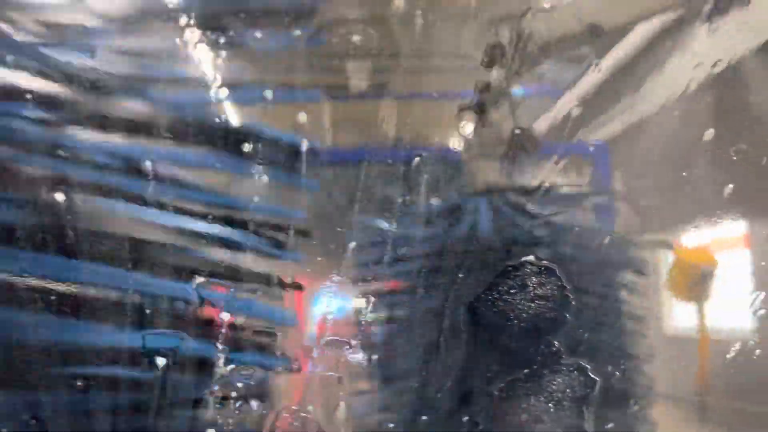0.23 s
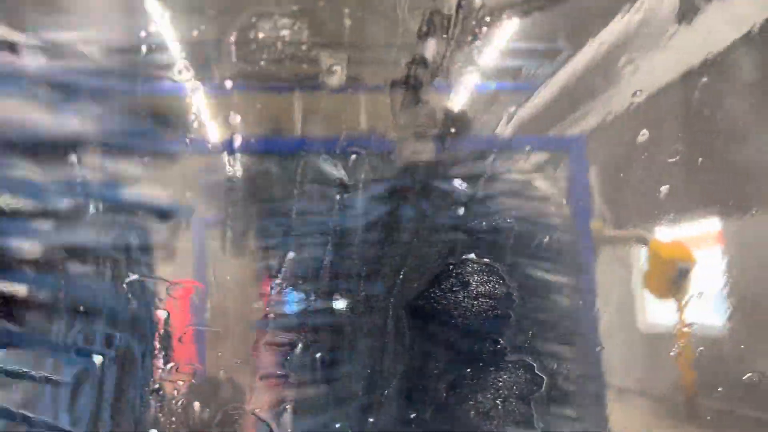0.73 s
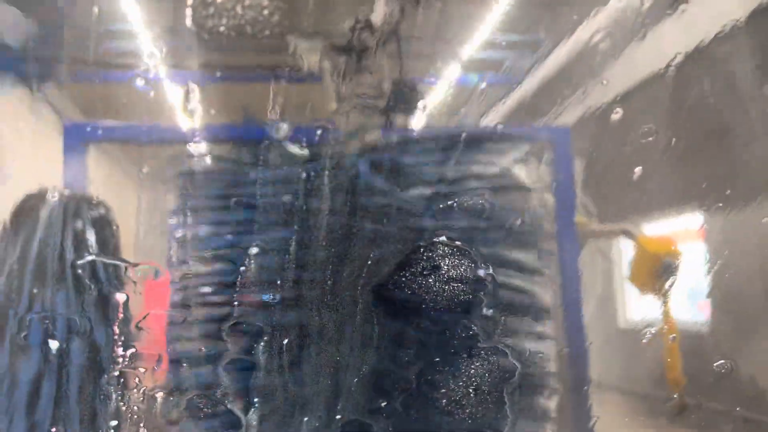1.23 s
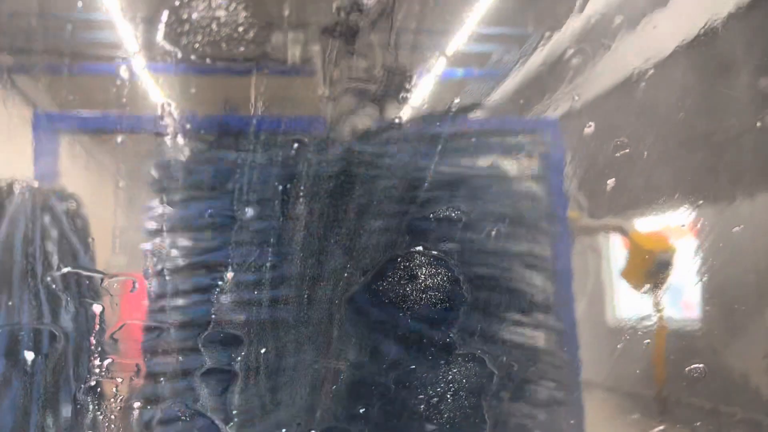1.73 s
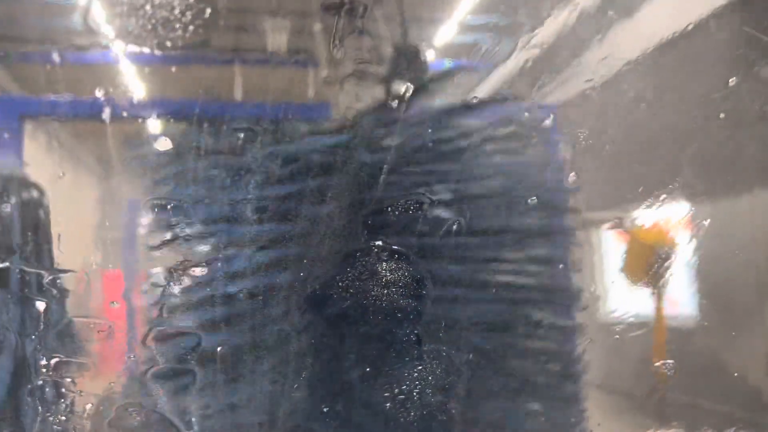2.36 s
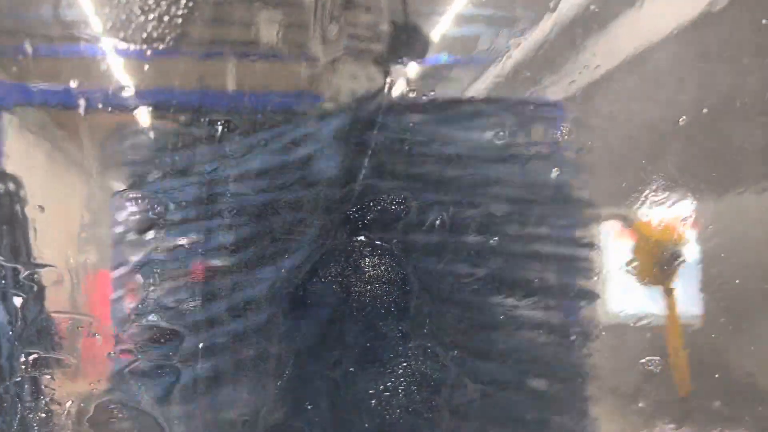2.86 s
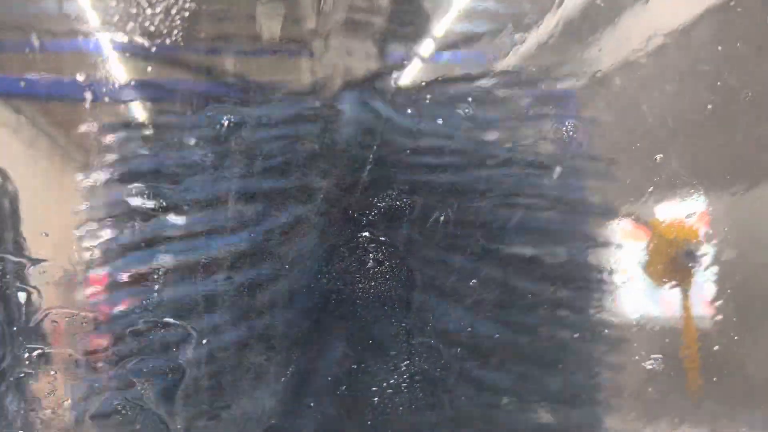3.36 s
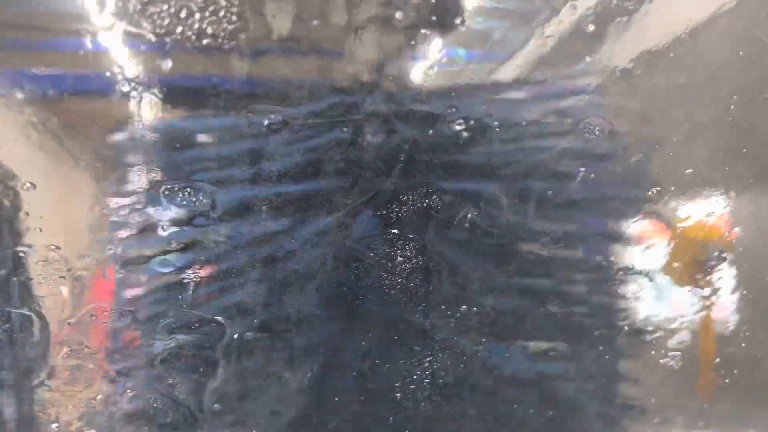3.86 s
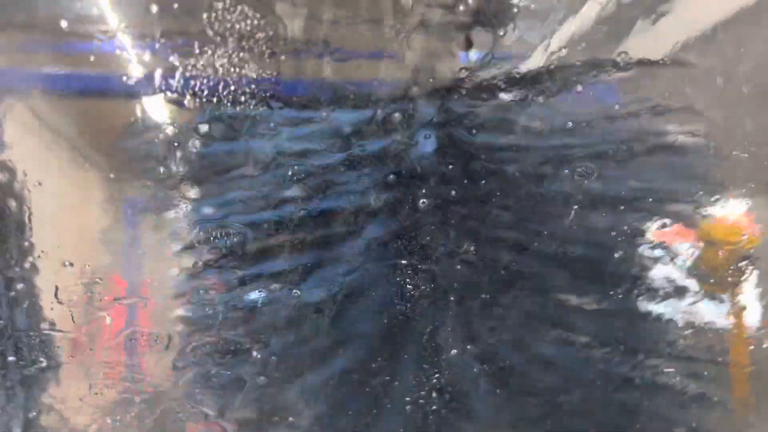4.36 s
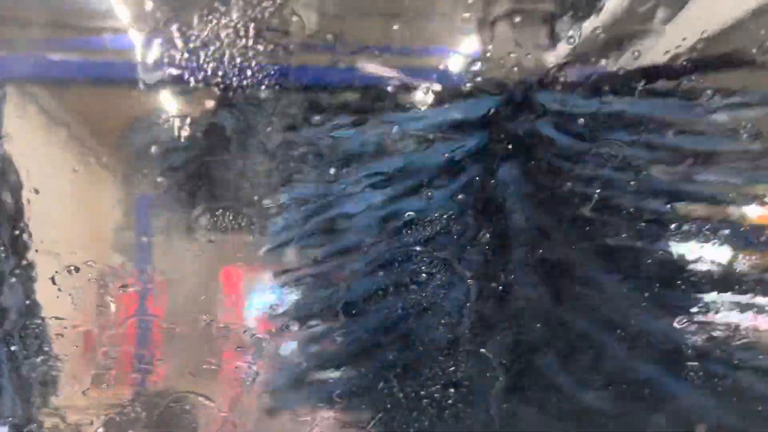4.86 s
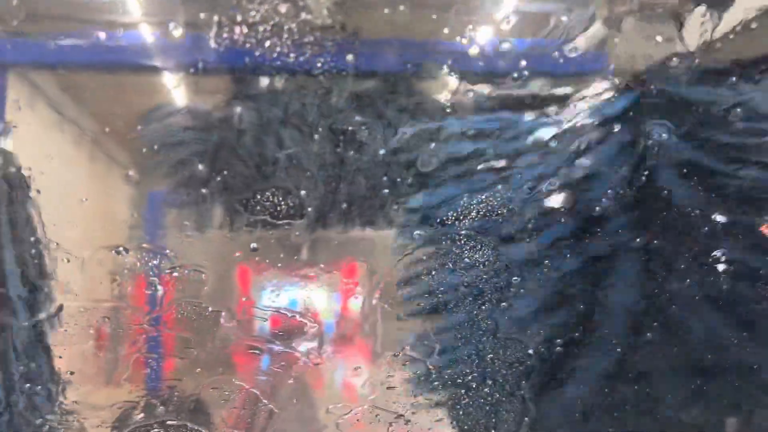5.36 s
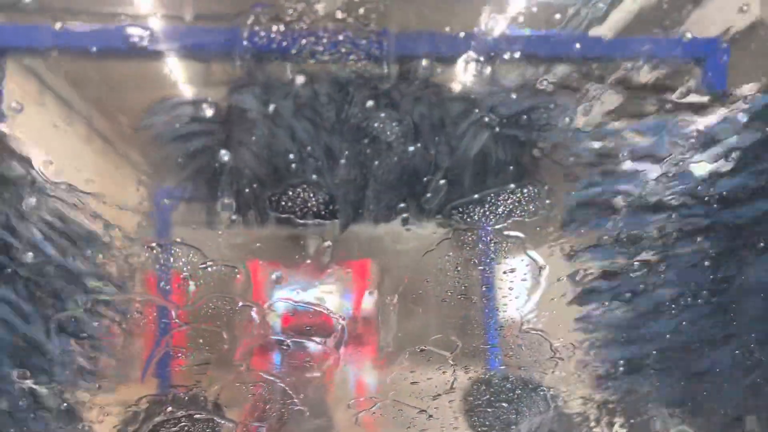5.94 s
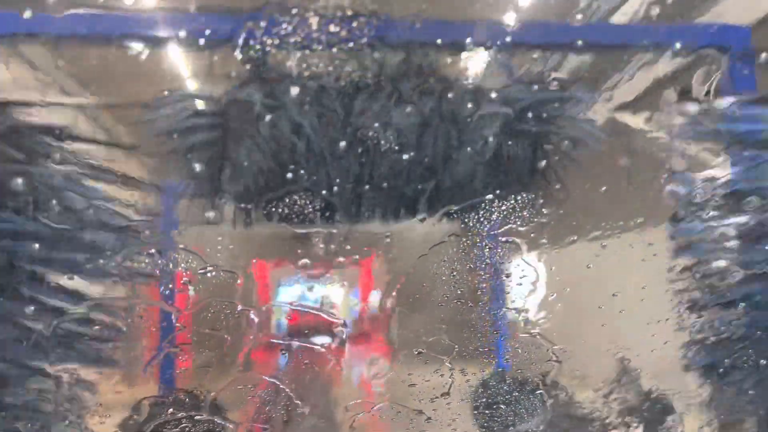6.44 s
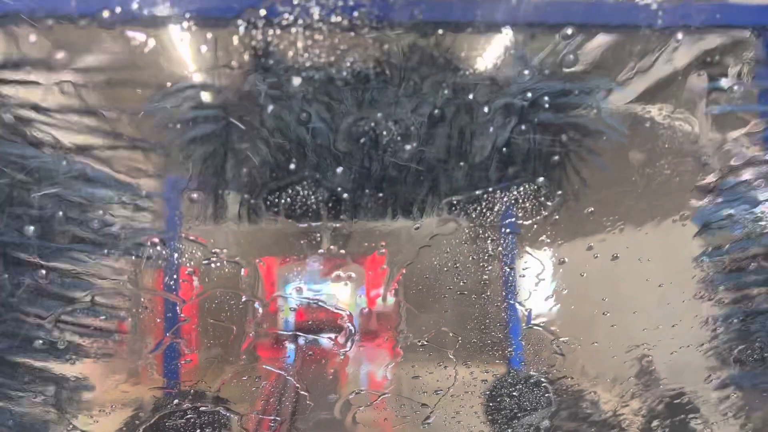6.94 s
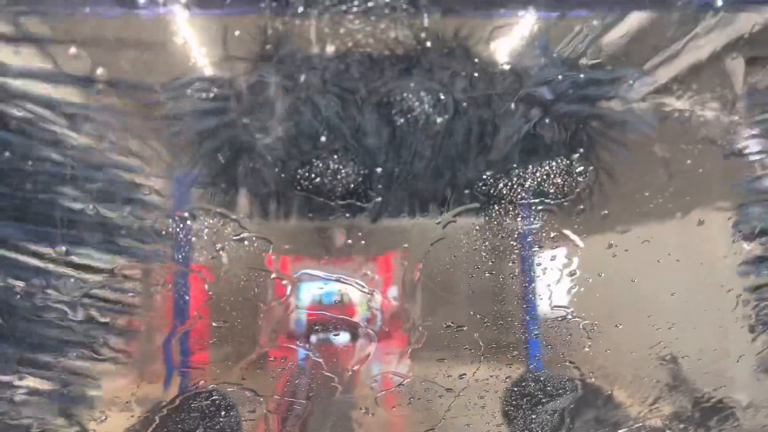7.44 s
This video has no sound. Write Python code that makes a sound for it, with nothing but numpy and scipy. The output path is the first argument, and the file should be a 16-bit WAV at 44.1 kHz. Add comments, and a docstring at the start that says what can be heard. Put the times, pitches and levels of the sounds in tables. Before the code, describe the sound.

Inside a closed car in an automatic wash, big cloth brushes drum and rumble on the body while water spray rushes and spatters over the glass.

```python
"""Front seats of a car in an automatic car wash, windows closed, a pair of microphone ports in the cabin.
From the start cloth brushes boom and drum on the body, spray rushes over the glass and machinery hums and whines.
Splats and hard drops hit the windscreen at once; soon a panel groans and knotted strip ends thump the door.
The roof boom and the spray ebb by the middle; just after 5 s the spray rushes up again, then thins out.
Blows and drops are shaped noise and short rings, panels are resonances, and the machines are wavering sines."""
import sys
import numpy as np
from scipy import signal
from scipy.fft import rfft, irfft
from scipy.io import wavfile
from scipy.ndimage import uniform_filter1d

SR = 44100
rng = np.random.default_rng(int(sys.argv[2]) if len(sys.argv) > 2 else 0)


def output_pcm(signal):
    """Save a mono or channel-first signal as 16-bit PCM at the path in sys.argv[1].

    Samples are clipped to [-1, 1] before scaling.
    """
    pcm = np.clip(np.atleast_2d(signal).T, -1, 1) * 32767
    wavfile.write(sys.argv[1], SR, np.round(pcm).astype(np.int16))


N = 339570

# Resonances of the roof with the cabin air. Each row: centre in Hz, width in Hz, relative level in dB.
ROOF_MODES = [(47, 14, 0), (66, 18, 1)]
# Resonances of the doors. Each row: centre in Hz, width in Hz, relative level in dB.
DOOR_PANEL_MODES = [(109, 43, 1.5), (149, 61, 2.5), (183, 69, -3.5)]
# Resonances of bonnet and windows. Each row: centre in Hz, width in Hz, relative level in dB.
BONNET_WINDOW_MODES = [(243, 94, -2.5), (306.5, 85, 0), (360, 42, -5.5), (448.5, 149, -9), (521, 90, -12),
                       (680, 142, -17)]
# Colour of fine spray behind the glass. Each row: frequency in Hz, relative level in dB per Hz.
SPRAY_COLOUR = [(600, 2.5), (1200, -2.5), (1900, 1.5), (2600, -.5), (3300, -2.5), (4200, -9.5),
                (5200, -19.5), (6300, -20), (8500, -28.5), (14000, -41)]
# Colour of drops behind the glass. Each row: frequency in Hz, relative level in dB per Hz.
DROP_COLOUR = [(1200, -28), (2600, 3.5), (3800, 3), (4800, 0.5), (6200, -11), (8300, -21.5), (11000, -39.5),
               (14500, -38.5)]
# How hard the brushes press on the car. Each row: time in seconds, pressure in dB above the usual.
BRUSH_PRESSURE = [(0, 1.5), (.47, 3.5), (1.0, 1), (2.1, 0.95), (3.3, -0.2), (4.0, 0), (5.05, 0.5),
                  (5.15, 0.3), (5.7, 0), (6.7, -0.3), (7.7, -0.5)]
# Roof boom, ebbing as the car rolls on; the pump hum follows. Each row: time in seconds, level in dB before trim.
ROOF_BOOM = [(0, -21.5), (.6, -21), (1.2, -22.5), (2.2, -24), (2.9, -22.5), (3.5, -26.5), (4.1, -26.5),
             (4.6, -27.5), (5.4, -28.5), (7.7, -27.5)]
# Water thrown at the glass, with a sudden rush as the brush swings aside.
# Each row: time in seconds, fine spray level in dB before trim.
WATER_FLOW = [(0, -36), (.55, -36.5), (.75, -38.5), (1.55, -37.5), (2.2, -39.5), (2.9, -41), (3.6, -42.5),
              (5.08, -42.5), (5.13, -37.5), (5.4, -38.5), (5.7, -38.5), (6.4, -39.5), (7.7, -42.5)]


def undb(db):
    """Decibels to gain."""
    return 10 ** (np.asarray(db) / 20)


def unit(x):
    """Scale to rms 1."""
    return x / np.sqrt(np.mean(x ** 2))


def curves(table):
    """The columns of a timed table, one value a sample."""
    s, *columns = np.transpose(table)
    return [np.interp(np.arange(N) / SR, s, c) for c in columns]


def over_hz(table):
    """The columns of a frequency table, one value a spectral bin, read along a log-frequency axis."""
    hz, *columns = np.transpose(table)
    log_bins = np.log(np.fft.rfftfreq(N, 1 / SR) + 1)
    return [np.interp(log_bins, np.log(hz), c) for c in columns]


def colour(points):
    """Gain of a (Hz, dB) spectrum."""
    return undb(over_hz(points)[0])


def resonances(modes):
    """Gain of a set of steep-sided resonances that are struck independently, so their powers add."""
    f = np.fft.rfftfreq(N, 1 / SR) + 1
    power = 0
    for hz, width, db in modes:
        detuning = (f * f - hz * hz) / (f * width)
        power = power + (undb(db) / (1 + detuning ** 2)) ** 2
    return np.sqrt(power)


def walk(rate):
    """Random levels held 1 / rate s and slewed twice; rms 1 or near it."""
    k = int(SR / rate)
    held = np.repeat(rng.standard_normal(N // k + 1), k)
    return unit(uniform_filter1d(uniform_filter1d(held, k), k)[:N])


def spells(table, edge_s):
    """Sum of (start, end, height) spells that each rise, hold and fall in straight lines."""
    t = np.arange(N) / SR
    return sum(height * np.clip(np.minimum(t - start, end - t) / edge_s + .5, 0, 1)
               for start, end, height in table)


def burst(s, rise_s, t60):
    """Envelope of one blow at time s: a quick rise and an exponential decay."""
    age = np.maximum(np.arange(N) / SR - s, 0)
    return (1 - np.exp(-age / rise_s)) * np.exp(-np.log(1000) * np.minimum(age / t60, 2))


def sizes(count, scatter_db):
    """Many small blows and a few big ones; a negative scatter makes many big and a few small."""
    return undb(scatter_db * np.minimum(rng.exponential(size=count), 5))


def impacts(per_s, scatter_db, t60):
    """Random blows whose noisy rings add up and die away in the cabin; two rows, rms near 1."""
    energy = sizes(N, scatter_db) ** 2 * (rng.random(N) < per_s / SR)
    keep = np.exp(-2 * np.log(1000) / (t60 * SR))  # share of the energy left after one sample
    ringing = signal.lfilter([1 - keep], [1, -keep], energy / energy.mean(), zi=[keep])[0]
    return np.sqrt(ringing) * rng.standard_normal((2, N))


def droplets(count, scatter_db, t60, low_hz, high_hz):
    """Each drop rings its spot of glass at a pitch of its own; two rows, as dense per Hz as noise of rms 1."""
    start, pitch, *phases = rng.random((count, 4)).T[:, :, None]
    age = np.arange(int(SR * .02))  # samples
    ring = sizes(count, scatter_db)[:, None] * np.exp(-np.log(1000) * age / (t60 * SR))
    turn = 2 * np.pi * (low_hz + pitch * (high_hz - low_hz)) * age / SR
    at = ((start * N).astype(int) + age).ravel()
    rows = []
    for phase in phases:
        drops = ring * np.sin(turn + 2 * np.pi * phase)
        rows.append(np.bincount(at, drops.ravel(), N)[:N])
    return unit(np.array(rows)) * np.sqrt(2 * (high_hz - low_hz) / SR)


def cabin_field(gain, sound):
    """Colour two unrelated rows of sound by glass or panels and mix them into what the two ports pick up."""
    # The two microphone ports, alike in the bass and less so higher up. Each row: frequency in Hz,
    # likeness from 0 to 1, lead of the left port in radians, left minus right in dB.
    port_pair = [(50, .99, 0, 0), (160, .95, -.1, 1.8), (230, .74, -.1, 0), (400, .68, .1, .4),
                 (600, .3, -.3, 1), (1000, .12, 0, 0), (1600, .5, 2.6, -2.5), (1700, .68, -.5, 5),
                 (2500, .68, -.6, 1), (3200, .62, -.9, 3.3), (4800, .56, -.6, 3.8), (6000, .4, .4, 2),
                 (7000, .9, 0, .3), (8400, .8, .5, 0), (9100, .95, np.pi, 0), (10700, .95, np.pi, 0),
                 (11500, .92, 0, 0)]
    likeness, lead, balance_db = over_hz(port_pair)
    likeness = np.clip(likeness, 0, 1)
    shared, apart = rfft(sound) * np.sqrt([1 + likeness, 1 - likeness])
    left = (shared + apart) * undb(balance_db / 2)
    right = (shared - apart) * undb(-balance_db / 2) * np.exp(-1j * lead)
    return irfft(np.array([left, right]) * unit(gain), N) / np.sqrt(2)


def brushes():
    """Hundreds of cloth strips a second slap the body and ring its panels; now and then the rumble surges."""
    # Lumpy surges in the rumble of the brushes.
    # Each row: time in seconds, change of the roof boom in dB, change of the door thud in dB.
    rumble_surges = [(.88, 4, -3.5), (1.37, 3, 4), (1.77, 1, 6), (2.83, 6.5, 2.5), (2.93, 3, 0.5),
                     (3.85, 8, -4.5), (4.16, 6.5, -3), (4.57, -1, 6.5), (5.28, 2.5, 3), (6.38, 3.5, 3),
                     (6.94, 5.5, 3)]
    surge_sigma_s = 0.026
    pressure_db, = curves(BRUSH_PRESSURE)
    boom_db, = curves(ROOF_BOOM)
    # level at the usual pressure in dB, and growth in dB per dB of pressure
    door_db = -22 + 0.7 * pressure_db
    drum_db = -22 + 0.8 * pressure_db
    for s, roof_change_db, door_change_db in rumble_surges:
        swell = np.exp(-.5 * ((np.arange(N) / SR - s) / surge_sigma_s) ** 2)
        boom_db = boom_db + roof_change_db * swell
        door_db = door_db + door_change_db * swell
    boom = impacts(per_s=290, scatter_db=1.0, t60=0.36) * undb(boom_db - 1.0)
    doors = impacts(per_s=610, scatter_db=0.2, t60=0.25) * undb(door_db)
    drum = impacts(per_s=720, scatter_db=0.2, t60=0.17) * undb(drum_db)
    return (cabin_field(resonances(ROOF_MODES), boom)
            + cabin_field(resonances(DOOR_PANEL_MODES), doors)
            + cabin_field(resonances(BONNET_WINDOW_MODES), drum))


def water():
    """Wet cloth scrubs the paint, spray spatters on the glass, and heavier drops patter through it."""
    # Colour of scrubbing cloth. Each row: frequency in Hz, relative level in dB per Hz.
    scrub_colour = [(250, -13), (550, 1.5), (800, 0), (1000, -1.5), (1250, -5), (1570, -4.5), (1700, -16),
                    (2500, -19.5), (5000, -55.5)]
    # A jet sweeps over the windscreen and adds heavy drops.
    # Each row: start in seconds, end in seconds, lift of the drops in dB.
    jet_sweeps = [(1.75, 2.76, 7), (3.98, 5.12, 5.5), (5.2, 5.72, 4)]
    # The strips fling the water in rough sheets.
    # Each row: start in seconds, end in seconds, added unevenness in dB.
    rough_sheets = [(-.2, .7, 1.0), (1.7, 2.8, .8)]
    pressure_db, = curves(BRUSH_PRESSURE)
    spray_db, = curves(WATER_FLOW)
    # scrubbing grows with the pressure and a little with the spray above its usual -39 dB
    scrub_db = -33.5 + 0.86 * pressure_db + 0.26 * (spray_db + 39)
    drops_db = spray_db - 10.5 + spells(jet_sweeps, edge_s=0.27)
    unevenness_db = 0.5 + spells(rough_sheets, edge_s=0.18)
    gush_db = unevenness_db * unit(walk(50) + 0.4 * walk(12))

    scrub = impacts(per_s=990, scatter_db=0.0, t60=0.067) * undb(scrub_db + 1.5)

    spatter = droplets(count=9000, scatter_db=2.5, t60=0.11, low_hz=992, high_hz=5204)
    rush = impacts(per_s=1800, scatter_db=1.3, t60=0.11)
    spray = (0.74 * rush + 0.71 * spatter) * undb(spray_db + gush_db + 1.5)

    # the more water hits the windscreen, the more of it comes as big separate drops
    coarse = np.clip((drops_db + 53.0) / 11, .15, .95)
    pings = droplets(count=4500, scatter_db=2.0, t60=0.0099, low_hz=2260, high_hz=6320)
    patter = 0.66 * pings + 0.72 * impacts(per_s=600, scatter_db=2.0, t60=0.088)
    mist = rng.standard_normal((2, N))
    drops = np.sqrt(1 - coarse) * mist + np.sqrt(coarse) * patter
    drops = drops * undb(drops_db + gush_db + .5 * walk(45))
    return (cabin_field(colour(scrub_colour), scrub)
            + cabin_field(colour(SPRAY_COLOUR), spray)
            + cabin_field(colour(DROP_COLOUR), drops))


def tone(hz, waver_hz, flutter_db, spread):
    """A machine tone of rms near 1; moving brushes shift its level and phase at each port."""
    phase = 2 * np.pi * np.cumsum(hz + waver_hz * walk(14)) / SR
    flutter = flutter_db * walk(9)
    ports = []
    for _ in range(2):
        level = undb(flutter + 2.6 * spread * walk(6.5))
        ports.append(level * np.sin(phase + spread * walk(2.97)))
    return np.sqrt(2) * np.array(ports)


def machinery():
    """The pump hums on two harmonics, two brush motors whine and beat, and a thin whistle swells in spells."""
    # The pump's second harmonic comes and goes. Each row: time in seconds, level in dB.
    pump_drone = [(0, -34.5), (3.5, -34.5), (3.9, -24.5), (4.3, -30.5), (4.8, -39), (5.4, -28), (5.85, -36),
                  (6.3, -25.5), (6.8, -35.5), (7.3, -35.5), (7.7, -31)]
    # The brush drive wanders in pitch and strength. Each row: time in seconds, whine in Hz, level in dB.
    brush_drive = [(0, 418.5, -41), (.3, 418.3, -27.5), (.95, 418.3, -30.5), (1.2, 419.6, -26),
                   (1.75, 418.5, -27.5), (2.05, 420, -35), (2.6, 419, -37), (3.1, 416.6, -32.5),
                   (3.7, 414, -34.5), (4.0, 419.3, -31), (4.3, 415, -27.5), (4.48, 417, -35.5),
                   (5.25, 414.5, -41), (5.5, 415.2, -32), (6.0, 418, -36), (6.3, 416.7, -28),
                   (6.68, 420.6, -31), (7.0, 418, -37), (7.7, 419, -40)]
    # The motor of the other brush, stronger while it is near.
    # Each row: time in seconds, level in dB relative to the first.
    other_motor = [(0, -3.5), (.95, -4.5), (1.2, -12.5), (3.5, -15.5), (5.0, -2.5), (7.7, -15.5)]
    # Louder spells of the whistle. Each row: start in seconds, end in seconds, lift in dB.
    whistle_spells = [(.3, .7, 15), (1.8, 2.2, 10.7), (6.42, 6.92, 13.3)]
    pump_hz = 59.2
    boom_db, = curves(ROOF_BOOM)
    drone_db, = curves(pump_drone)
    drive_hz, drive_db = curves(brush_drive)
    twin_db, = curves(other_motor)
    hum = tone(pump_hz, waver_hz=0.47, flutter_db=-1.5, spread=.03) * undb(boom_db - 6.5)
    drone = tone(2 * pump_hz, waver_hz=0.88, flutter_db=2.5, spread=0.18) * undb(drone_db)
    first = tone(drive_hz, waver_hz=0.4, flutter_db=-0.16, spread=0.59)
    # the other motor whines 4.7 Hz lower and beats with the first
    twin = tone(drive_hz - 4.7, waver_hz=0.54, flutter_db=4.3, spread=0.3)
    whine = (first + undb(twin_db) * twin) * undb(drive_db)
    whistle_hz = 1481 + 2 * np.arange(N) / SR  # rises 2 Hz a second
    whistle = tone(whistle_hz, waver_hz=5, flutter_db=1.5, spread=0.4)
    whistle = whistle * undb(-59.5 + spells(whistle_spells, edge_s=0.042))
    return hum + drone + whine + whistle


def small_splats(count=14):
    """Lesser splats at random times, growing with the spray; rows like those of the splat table."""
    spray_db, = curves(WATER_FLOW)
    rows = []
    for when, size in rng.random((count, 2)):
        db = spray_db[int(when * N)] - 9.5 + 2.5 * (2 * size - 1)
        rows.append((when * N / SR, db, 0.5, 0.054))
    return rows


def splats(spread=0.046):
    """Flung water bursts into droplets on the glass; the wet strip behind it adds a duller slap."""
    # Splats on the windscreen. Each row: time in seconds, level in dB before trim,
    # dull share in dB relative to the bright one before trim, envelope decay by 60 dB in seconds.
    windscreen_splats = [(0.033, -37.5, 6, 0.14), (.15, -38.5, -4, 0.079), (.226, -35.5, -2.5, 0.045),
                         (.286, -41.5, 9.5, 0.054), (.336, -36.5, -10, 0.089), (.392, -42.5, 10, .05),
                         (.422, -41, 9.5, 0.14), (.488, -43.5, 0, .06), (.511, -41, 6.5, 0.09),
                         (0.591, -32, -3, 0.11), (.641, -40, 2, .07), (.896, -37, -3.5, 0.042),
                         (1.036, -43.5, 8, 0.087), (1.517, -38, -2.5, 0.071), (1.548, -41.5, -2, 0.043),
                         (1.738, -45, 5, .07), (1.778, -41.5, -3.5, .06), (1.863, -33, -3.5, 0.041),
                         (1.898, -32, -7, 0.036), (1.984, -38, -4, .04), (2.043, -31.5, -16, 0.17),
                         (2.088, -40, -4, 0.1), (2.125, -41, -3, 0.04), (2.213, -36.5, -9, 0.044),
                         (2.24, -38.5, -2.5, 0.07), (2.318, -42.5, 1, 0.054), (2.46, -37.5, -10.5, .045),
                         (2.578, -37.5, -10.5, 0.044), (2.626, -38.5, -5.5, 0.048),
                         (2.717, -35.5, -10, 0.07), (2.765, -40, -7.5, .05), (3.037, -39, -8.5, .05),
                         (4.271, -39.5, -12, 0.087), (4.862, -47.5, 9, 0.054), (4.945, -41, -11, .1),
                         (5.12, -44, 5.5, 0.15), (5.19, -44, 7.5, .1), (5.36, -41, 2.5, .1),
                         (5.571, -43, 6, 0.024), (5.784, -34.5, -4, 0.11), (5.889, -40, 5, 0.05),
                         (5.955, -38, 7, 0.081), (6.128, -43, -9, .07), (6.371, -45, 9, 0.095),
                         (6.275, -45, -10, .07), (6.566, -43, 7.5, 0.17), (6.67, -39.5, 0, 0.086),
                         (6.787, -38, -13, .068), (7.043, -43.5, -1, .06)]
    bright, dull = np.zeros((2, N))
    for s, db, dull_db, t60 in windscreen_splats + small_splats():
        splash = undb(db) * burst(s, rise_s=spread * t60, t60=t60)  # a longer splat also rises more slowly
        bright += splash
        dull += splash * undb(dull_db)
    shower = undb(5.0) * impacts(per_s=2500, scatter_db=2.5, t60=0.019)
    slap = undb(6.5) * impacts(per_s=650, scatter_db=-5.0, t60=0.0091)
    return (cabin_field(colour(DROP_COLOUR), bright * shower)
            + cabin_field(colour(SPRAY_COLOUR), dull * slap))


def ticks():
    """A hard drop cracks brightly, straight at the ports, and its spot of glass rings briefly into the cabin."""
    # Hard single drops on the glass. Each row: time in seconds, ring of the glass in dB before trim and filter,
    # pitch of that spot in Hz, bright crack in dB.
    hard_drops = [(0.035, -31, 6000, -46), (0.284, -42, 7500, -44), (.424, -50, 8000, -54),
                  (.595, -34, 5200, -50), (1.041, -50, 6000, -56), (1.427, -47, 7000, -54),
                  (1.836, -44, 7200, -48), (2.423, -45, 7500, -52), (2.517, -45, 6500, -57),
                  (4.872, -50, 6500, -57.5), (5.433, -47, 7000, -55), (5.665, -46, 7000, -52),
                  (5.954, -40, 3100, -53), (6.114, -54, 8000, -55), (6.130, -39.5, 6200, -54),
                  (6.567, -38, 6400, -53), (6.669, -42, 5517, -42), (6.786, -33.5, 4500, -43)]
    # Colour of the ringing glass. Each row: frequency in Hz, relative level in dB per Hz.
    ring_colour = [(2500, -21.5), (3700, -6.5), (4600, 11), (6000, 6.5), (7500, 1), (10500, -6.5),
                   (14500, -12.5)]
    # Colour of the bright crack. Each row: frequency in Hz, relative level in dB per Hz.
    crack_colour = [(3000, -21.5), (6000, -0.5), (8000, 4), (10000, -15.5), (13000, -1.5), (15000, -4.5)]
    noise = rng.standard_normal((2, N))
    ring, crack = 0, 0
    for s, ring_db, hz, crack_db in hard_drops:
        band_hz = hz * 1.4 ** np.array([-1, 1])  # each spot rings this factor below and above its pitch
        spot = signal.butter(1, band_hz, "bandpass", fs=SR)
        strike = burst(s, rise_s=0.0022, t60=0.07)
        ring = ring + undb(ring_db - 1.7) * strike * signal.lfilter(*spot, noise)
        crack = crack + undb(crack_db) * burst(s, rise_s=0.002, t60=0.031)
    grit = crack * impacts(per_s=1100, scatter_db=4.0, t60=0.006)
    direct = irfft(rfft(grit) * unit(colour(crack_colour)), N)
    return cabin_field(colour(ring_colour), ring) + direct


def groans():
    """Dragging cloth keeps one narrow panel resonance ringing; its pitch slides as the contact moves."""
    # A brush drags along a panel.
    # Each row: start in seconds, end in seconds, first pitch in Hz, last pitch in Hz, level in dB.
    panel_drags = [(0.274, 1.294, 112, 90.3, -21), (1.702, 2.25, 140.8, 137, -32),
                   (3.544, 4.298, 144, 153.3, -28.5), (5.3, 5.998, 233, 214, -33),
                   (6.523, 6.917, 196, 185.5, -26), (7.135, 7.575, 187.4, 165.5, -30)]
    width_hz = 13
    t = np.arange(N) / SR
    out = np.zeros(N)
    for start, end, first_hz, last_hz, db in panel_drags:
        phase = 2 * np.pi * np.cumsum(np.interp(t, [start, end], [first_hz, last_hz])) / SR
        ring = walk(2 * width_hz) * np.sin(phase) + walk(2 * width_hz) * np.cos(phase)
        out += undb(db) * spells([(start, end, 1)], edge_s=0.3) * ring
    return out


def thumps(rise_s=0.0011):
    """One firm blow sets the roof, door, bonnet and window resonances ringing together."""
    # The knotted end of a strip thumps a door panel. Each row: time in seconds, peak level in dB.
    knot_blows = [(.208, -7), (.448, -8), (0.532, -6), (.692, -13), (1.385, -12), (1.76, -11.5),
                  (3.925, -18), (4.561, -12), (5.128, -11), (6.383, -12)]
    age = np.arange(SR // 5) / SR
    ring = np.zeros(len(age))
    for hz, width, db in ROOF_MODES + DOOR_PANEL_MODES + BONNET_WINDOW_MODES:
        decay = np.exp(-np.pi * width * age)
        ring += undb(db) * np.sqrt(width) * decay * np.sin(2 * np.pi * hz * age)
    ring = ring * (1 - np.exp(-age / rise_s))
    blows = np.zeros(N)
    for s, db in knot_blows:
        blows[int(s * SR)] = undb(db)
    return signal.fftconvolve(blows, ring / np.abs(ring).max())[:N]


def scene():
    """Everything that reaches the front seats."""
    return brushes() + water() + machinery() + splats() + ticks() + groans() + thumps()


def record(dry):
    """The microphone cuts the deepest rumble, below 27 Hz, and the top, above 14.9 kHz."""
    thinned = signal.sosfilt(signal.butter(2, 27, "highpass", fs=SR, output="sos"), dry)
    return signal.sosfilt(signal.ellip(8, .2, 70, 14900, fs=SR, output="sos"), thinned)


dry = scene()
out = record(dry)
output_pcm(out)
```